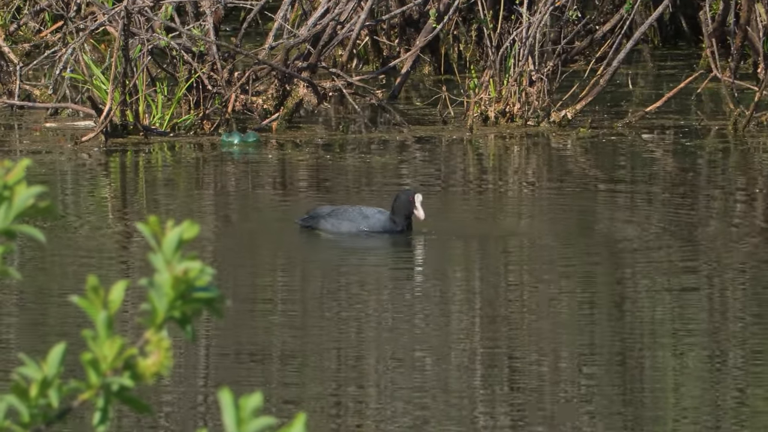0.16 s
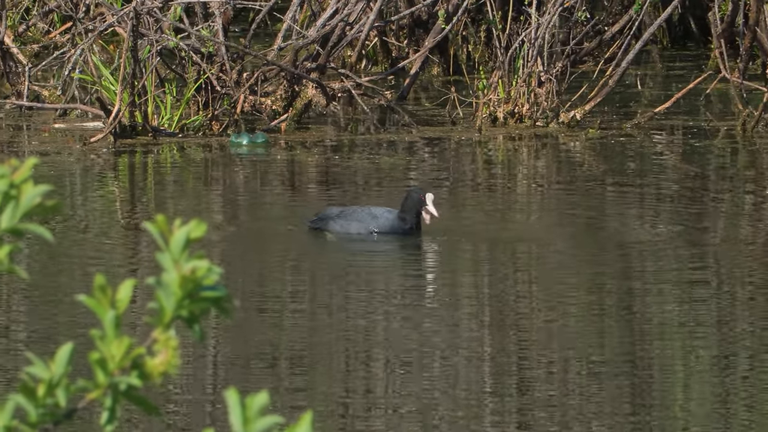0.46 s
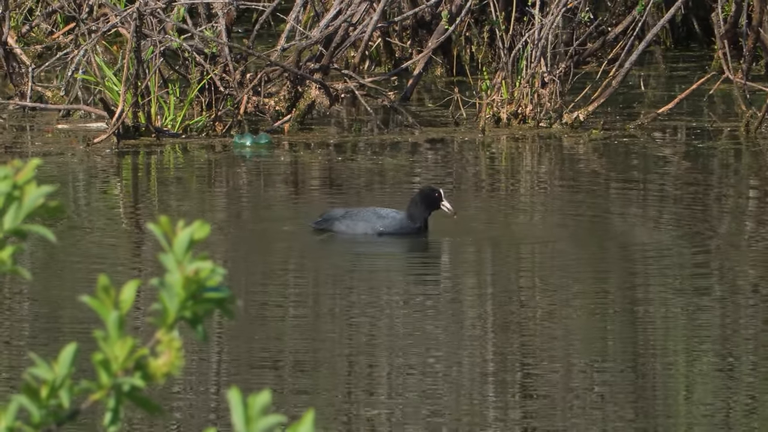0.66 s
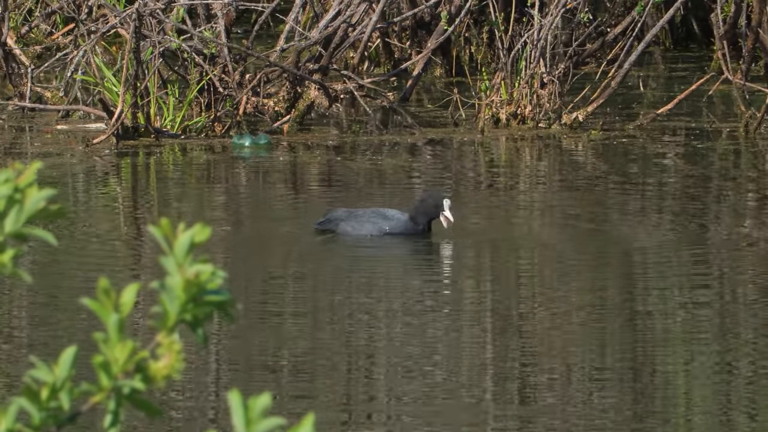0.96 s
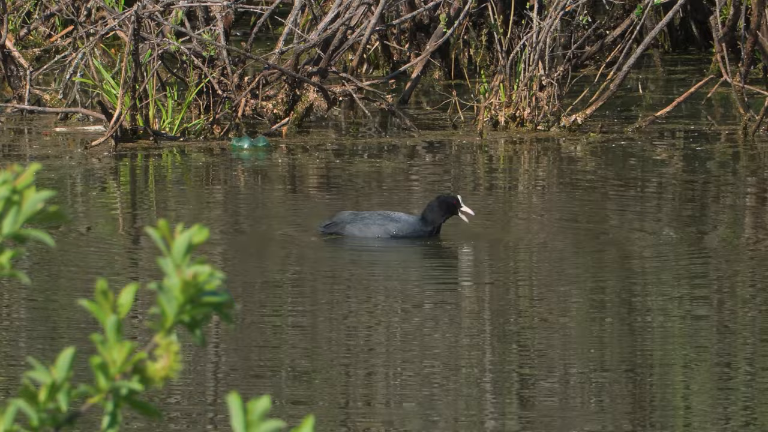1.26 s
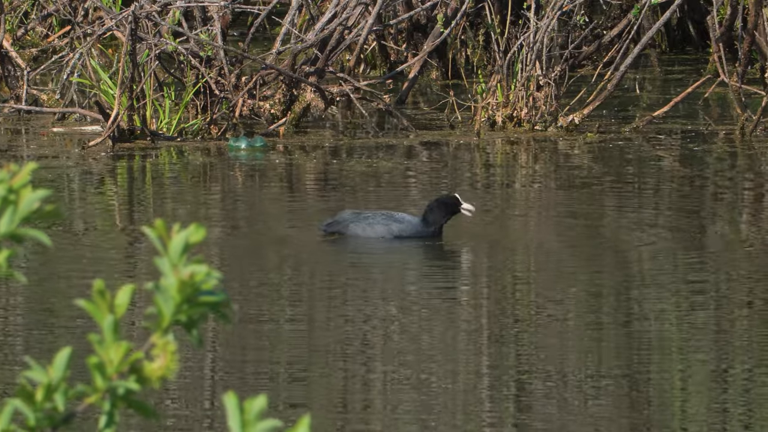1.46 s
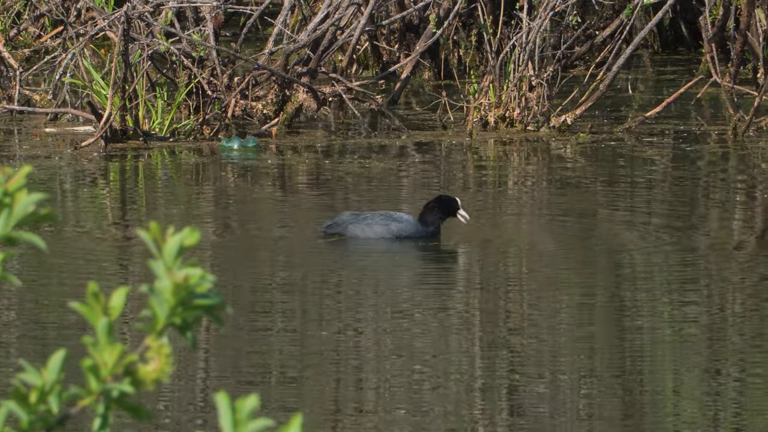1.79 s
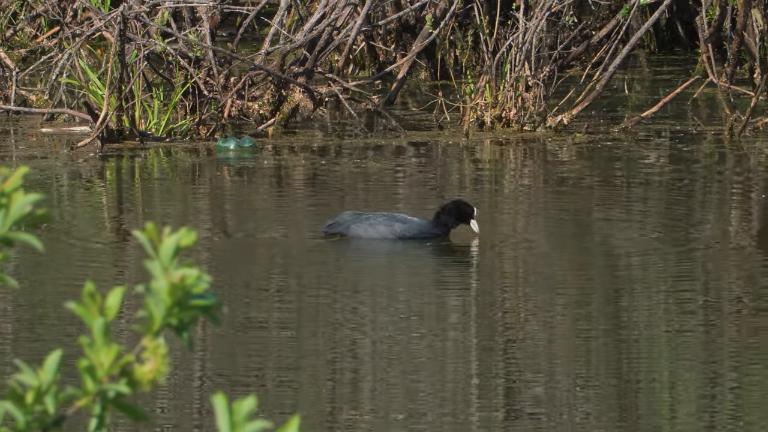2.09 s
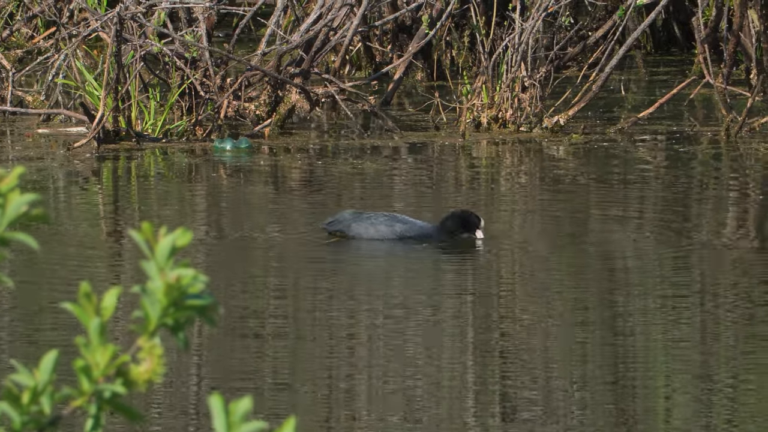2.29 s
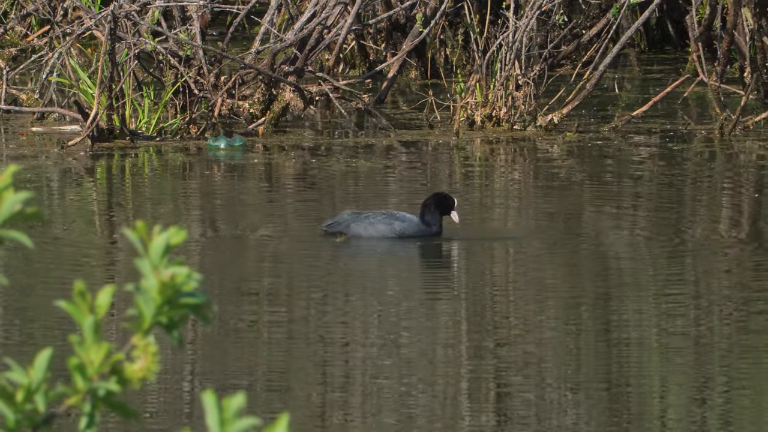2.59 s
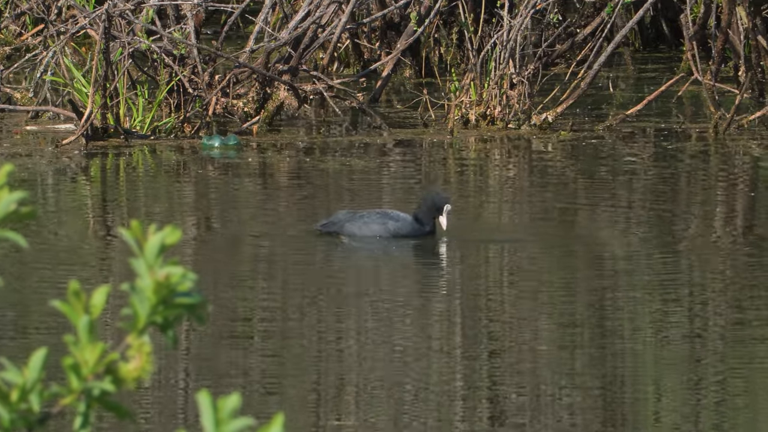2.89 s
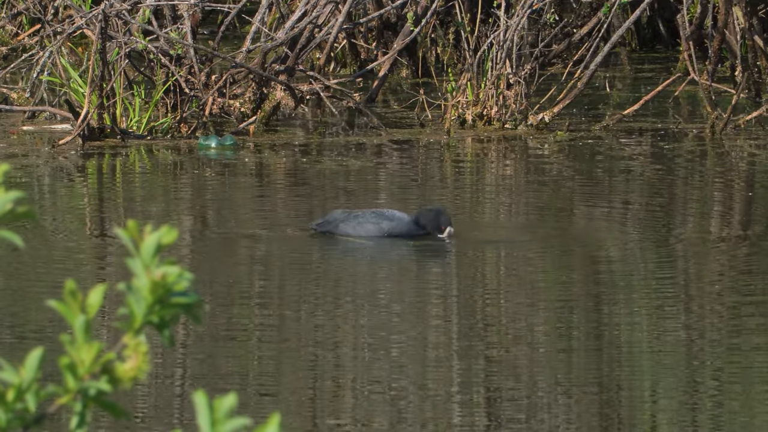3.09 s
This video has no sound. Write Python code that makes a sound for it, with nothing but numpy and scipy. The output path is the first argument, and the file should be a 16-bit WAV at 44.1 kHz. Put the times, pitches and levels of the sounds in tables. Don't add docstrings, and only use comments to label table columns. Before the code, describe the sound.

Outdoors at a pond, four clipped nasal waterbird honks come spaced about a second apart, the first faint. Overlapping frogs croak throughout, thickening later, while high songbird whistles repeat over soft air noise and distant machinery hum.

```python
import sys
import numpy as np
from scipy import signal
from scipy.fft import rfft, irfft
from scipy.io import wavfile
from scipy.ndimage import uniform_filter1d

SR = 44100
rng = np.random.default_rng(int(sys.argv[2]) if len(sys.argv) > 2 else 0)


def natural_amplitude(level_db):
    exponent = np.asarray(level_db, float) / 20
    return 10 ** exponent


def to_wav(s):
    ch = np.atleast_2d(s).T
    pcm = np.round(np.clip(ch, -1, 1) * 32767)
    wavfile.write(sys.argv[1], SR, pcm.astype(np.int16))


N = 143325


def rms1(x):
    return x / np.sqrt(np.mean(x ** 2) + 1e-18)


def walk(rate_hz, size=N):
    k = max(int(SR / rate_hz), 1)
    steps = np.repeat(rng.standard_normal(size // k + 1), k)
    return 1.24 * uniform_filter1d(uniform_filter1d(steps, k), k)[:size]


def ring(x, hz, width_hz):
    b, a = signal.iirpeak(hz, hz / width_hz, fs=SR)
    return signal.lfilter(b, a, signal.lfilter(b, a, x))


def add(out, start_s, x):
    i = max(int(start_s * SR), 0)
    out[i:i + len(x)] += x[:N - i]


def shape(length_s, attack_s, release_s):
    t = np.arange(int(length_s * SR)) / SR
    edge = np.clip(np.minimum(t / attack_s, (length_s - t) / release_s), 0, 1)
    return t / length_s, np.sin(edge * np.pi / 2)


def tone(hz, phase=0):
    return np.sqrt(2) * np.sin(2 * np.pi * np.cumsum(hz) / SR + phase)


# frequency in Hz, density in dB per Hz.
HUSH_SPECTRUM = [(26, -5), (42, -4), (90, -7), (170, -10), (300, -13), (900, -13), (2600, -28), (5200, -51)]
HUSH_DB = -43


def hush():
    f = np.maximum(np.fft.rfftfreq(N, 1 / SR), 1)
    hz, level_db = np.array(HUSH_SPECTRUM).T
    db = np.interp(np.log(f), np.log(hz), level_db, left=-40)
    db = db - 14 * np.maximum(np.log2(f / hz[-1]), 0)
    air = rms1(irfft(rfft(rng.standard_normal(N)) * natural_amplitude(db), N))
    return air * natural_amplitude(HUSH_DB + 0.8 * walk(2.8))


CHORUS_HZ, CHORUS_WIDTH_HZ, CHORUS_DB = 1700, 850, -46.5


def far_chorus():
    blur = rms1(ring(rng.standard_normal(N), CHORUS_HZ, CHORUS_WIDTH_HZ))
    return blur * natural_amplitude(CHORUS_DB + 1.7 * walk(14) + 0.87 * walk(220))


# time in seconds, level in dB.
HUM_LEVELS = [(0.0, -51.5), (1.38, -48), (1.42, -56), (1.47, -49), (1.76, -53.5), (1.79, -42.5),
              (1.95, -51), (1.97, -47), (2.34, -45), (2.39, -60), (2.42, -46.5), (2.52, -42.5), (2.56, -54),
              (2.72, -43.5), (2.82, -50.5), (3.01, -44), (3.13, -56.5), (3.25, -42.5)]
HUM_HZ, HUM_WANDER_DB, HUM_DRIFT = 120, 2.2, 0.02


def machinery():
    swell_db = np.interp(np.arange(N) / SR, *np.array(HUM_LEVELS).T)
    return tone(HUM_HZ * (1 + HUM_DRIFT * walk(7.68))) * natural_amplitude(swell_db + HUM_WANDER_DB * walk(19))


# start in seconds, peak in dB.
WATER_CLICK = [
    (3.1672, -51),
]


def water_click():
    out, t = np.zeros(N), np.arange(SR // 100) / SR
    for s, db in WATER_CLICK:
        click = rms1(ring(rng.standard_normal(len(t)), 10500, 6000))
        add(out, s, click * np.exp(-t / 0.0022) * natural_amplitude(db - 9))
    return out


# middle of croak in seconds, level in dB, throat pitch in Hz.
SMALL_FROG = [(0.082, -42, 2200), (0.218, -46.5, 2400), (0.444, -35.5, 2020), (0.566, -33.5, 2060),
              (0.673, -33, 2080), (0.825, -34.5, 2100), (0.938, -38, 2170), (1.066, -40, 2220),
              (1.19, -41.5, 2190), (1.31, -37, 2110), (2.677, -34, 1800), (3.028, -31, 1780),
              (0.49, -36.5, 1710), (0.715, -39.5, 1400), (0.77, -36, 2070), (3.06, -51, 2040)]
OTHER_FROG = [(1.428, -47, 2180), (1.54, -41, 2140), (1.638, -39, 2080), (1.817, -67, 2200),
              (1.994, -42.5, 2080), (2.05, -43, 2130), (2.104, -41, 2140), (2.218, -39.5, 2260),
              (2.332, -39, 2140), (2.444, -36.5, 2060), (2.568, -33.5, 2020), (2.682, -37, 2110),
              (2.809, -38, 2050), (2.912, -37.5, 2130), (2.99, -40.5, 2100), (3.18, -48.5, 2180)]
BIG_FROGS = [(0.207, -72, 1700), (0.272, -59, 1550), (0.334, -38.5, 1810), (0.383, -40, 1620),
             (0.599, -39.5, 1230), (0.78, -37, 1510), (0.857, -38.5, 1530), (1.117, -41, 1420),
             (1.197, -35.5, 1430), (1.264, -35, 1500), (1.396, -34.5, 1650), (1.445, -35, 1660),
             (1.551, -32.5, 1540), (1.614, -36.5, 1610), (1.686, -30, 1650), (1.835, -33.5, 1510),
             (1.882, -40, 1500), (1.945, -33, 1450), (2.043, -31.5, 1556), (2.115, -31, 1700),
             (2.207, -34, 1700), (2.297, -33, 1510), (2.407, -30, 1520), (2.555, -32, 1480),
             (2.628, -33.5, 1730), (2.721, -35, 1530), (2.809, -32, 1700), (2.903, -30, 1606),
             (3.132, -35.5, 1510), (3.216, -32, 1370)]
DEEP_FROG = [(1.65, -37, 1150), (1.69, -33, 1200), (1.585, -38.5, 1170), (1.755, -35.5, 1420),
             (1.81, -43, 1200), (1.9, -47.5, 1250), (1.94, -45, 1190), (2.01, -36.5, 1380),
             (2.16, -36, 1420), (2.25, -44.5, 1330), (2.5, -32, 1450), (0.78, -41, 1170), (0.86, -45, 1010),
             (2.35, -42.5, 1300), (2.96, -43, 1320)]
# croak in seconds, pulses per second, throat width in Hz, sac over throat pitch, sac in dB.
SMALL_VOICE, OTHER_VOICE = (.055, 270, 480, 2.08, -15), (.06, 280, 450, 1.73, -13)
BIG_VOICE = (.07, 265, 500, 2.3, -19)
CROAK_SLOWING, CROAK_JITTER, CROAK_SPREAD = .12, .035, .09
CROAK_SCATTER_DB, CROAK_RASP, SAC_WIDTH_HZ, FROG_DB, FROG_TOP_HZ = 1.4, .3, 680, -3, 4760


def croak(hz, voice):
    length_s, rate_hz, width_hz, sac, sac_db = voice
    u, env = shape(length_s, length_s / 2, length_s / 2)
    slowing = CROAK_SLOWING * np.arange(40) / (rate_hz * length_s)
    uneven = CROAK_JITTER * rng.standard_normal(40) + CROAK_SPREAD * rng.standard_normal()
    at = (np.cumsum((1 + slowing + uneven) / rate_hz) * SR).astype(int)
    at = at[at < len(u)]
    pulses = np.zeros(len(u))
    pulses[at] = natural_amplitude(CROAK_SCATTER_DB * rng.standard_normal(len(at)))
    drive = rms1(pulses) + CROAK_RASP * rng.standard_normal(len(u))
    throat = rms1(ring(drive, hz, width_hz))
    return (throat + natural_amplitude(sac_db) * rms1(ring(drive, sac * hz, SAC_WIDTH_HZ))) * env


def frogs():
    out = np.zeros(N)
    for table, voice in ((SMALL_FROG, SMALL_VOICE), (OTHER_FROG, OTHER_VOICE),
                         (BIG_FROGS, BIG_VOICE), (DEEP_FROG, BIG_VOICE)):
        for middle_s, db, hz in table:
            add(out, middle_s - voice[0] / 2, croak(hz, voice) * natural_amplitude(db + FROG_DB))
    return signal.sosfilt(signal.butter(6, FROG_TOP_HZ, fs=SR, output="sos"), out)


# start in seconds, peak in dB.
TICKS = [(1.1644, -55), (1.775, -49.5), (2.019, -57), (2.22, -52), (2.375, -50.5), (2.5062, -50),
         (2.734, -52.5), (2.9482, -57), (3.2231, -53)]
TICK_HZ, TICK_WIDTH_HZ, TICK_DECAY_S, TICK_DB = 5250, 1800, 0.014, -4


def ticks():
    out, t = np.zeros(N), np.arange(SR // 20) / SR
    for s, db in TICKS:
        narrow = ring(rng.standard_normal(len(t)), TICK_HZ, TICK_WIDTH_HZ)
        rasp = rms1(ring(narrow, TICK_HZ, 2 * TICK_WIDTH_HZ))
        add(out, s, rasp * np.exp(-t / TICK_DECAY_S) * natural_amplitude(db + TICK_DB))
    return out


# start in seconds, length in seconds, from Hz, to Hz, level in dB.
SLURS = [(2.431, .042, 4260, 3730, -42), (.308, .072, 4600, 4930, -59), (.72, .125, 4670, 4960, -59),
         (1.148, .114, 4720, 5000, -62), (1.585, .11, 4800, 4980, -62), (.929, .117, 3320, 3600, -45),
         (1.658, .08, 3900, 4190, -46), (2.943, .115, 3000, 3830, -50), (.67, .03, 5200, 6920, -65),
         (2.325, .065, 4650, 4270, -53), (1.556, .032, 4200, 3720, -41), (2.187, .036, 3700, 4200, -50),
         (1.824, .052, 3180, 3320, -42), (.09, .026, 4400, 4100, -55), (2.296, .036, 3700, 4050, -52)]
BURRED = [
    (.094, .11, 3900, 3050, -41.5),
    (.494, .112, 3900, 3070, -42.5),
    (.911, .105, 3880, 3080, -47),
    (1.327, .112, 3950, 3040, -47),
    (1.757, .105, 3800, 3040, -47),
    (2.114, .1, 3300, 2760, -50),
]
GLIDES = [(.857, .046, 3310, 3220, -43), (.898, .028, 3300, 3280, -43), (1.05, .045, 3560, 3600, -54),
          (1.091, .026, 4140, 4120, -47), (1.11, .032, 4110, 3590, -45), (1.211, .092, 2830, 2920, -45),
          (1.297, .056, 2960, 2940, -50), (1.772, .05, 4190, 4190, -49), (1.868, .072, 3270, 3490, -42.5),
          (1.934, .052, 3470, 3080, -41), (2.225, .032, 4250, 3400, -57), (2.223, .075, 5100, 4730, -58),
          (2.178, .042, 5330, 5320, -62), (2.312, .02, 3500, 4700, -53), (2.3, .03, 5000, 5200, -60),
          (2.115, .022, 3300, 3050, -50), (2.412, .026, 4300, 4310, -51), (3.208, .042, 3940, 4010, -51),
          (1.972, .28, 6200, 5550, -75), (2.632, .168, 8320, 7550, -80), (3.168, .068, 1290, 1260, -44),
          (2.383, .034, 4180, 4050, -55), (.072, .024, 6600, 4500, -63), (1.526, .036, 6050, 4150, -49),
          (1.372, .05, 2970, 2840, -54), (1.578, .046, 3720, 3680, -38), (1.617, .052, 3770, 3670, -44),
          (2.463, .05, 3720, 3680, -41), (2.512, .045, 3690, 3680, -45), (1.826, .165, 4170, 4160, -63),
          (1.145, .045, 3580, 3750, -53), (1.732, .03, 3700, 3690, -52), (2.2, .1, 2820, 2880, -56),
          (2.145, .02, 2950, 3250, -53), (2.03, .08, 2900, 3000, -55), (1.985, .035, 3050, 3300, -50),
          (2.655, .05, 3680, 3760, -53), (2.775, .05, 3720, 3800, -52), (2.605, .022, 3150, 3300, -51)]
# start in seconds, length in seconds, centre in Hz, level in dB.
TRILLS = [
    (0.212, 0.099, 4390, -59.5),
    (2.035, 0.07, 3590, -57),
]
TRILL_SWING_HZ, TRILL_RATES_HZ, TRILL_DEPTHS = 285, (43, 72), (.2, .9)
SLUR_BEND, FALL_FADE_DB, GLIDE_FADE_DB = 3.3, 6, 2
BURR_HZ, BURR_DEPTH, BURR_FADE_DB, BURR_PEAK, BURR_RISE_S = 250, .55, 8, .36, .035
WHISTLE_ATTACK_S, WHISTLE_RELEASE_S, WHISTLE_FLUTTER_DB, WHISTLE_JITTER = .008, .01, 1.5, .005


def whistles():
    out, wobble, flutter = np.zeros(N), walk(90), walk(70)

    def sing(s, length, track, db, fade_db=0, throb_hz=0, depth=0, peak=0.46, rise_s=WHISTLE_ATTACK_S):
        u, env = shape(length, rise_s, WHISTLE_RELEASE_S)
        i = np.minimum(int(s * SR) + np.arange(len(u)), N - 1)
        env = env * (1 + depth * np.sin(2 * np.pi * throb_hz * length * u))
        level_db = db - fade_db * 2 * np.abs(u - peak) + WHISTLE_FLUTTER_DB * flutter[i]
        add(out, s, tone(track(u) * (1 + WHISTLE_JITTER * wobble[i])) * env * natural_amplitude(level_db))

    def settle(u):
        end = np.exp(-SLUR_BEND)
        return (np.exp(-SLUR_BEND * u) - end) / (1 - end)

    for s, length, a, b, db in SLURS:
        sing(s, length, lambda u: b + (a - b) * settle(u), db, FALL_FADE_DB * (a > b))
    for s, length, a, b, db in BURRED:
        sing(s, length, lambda u: b + (a - b) * settle(u), db,
             BURR_FADE_DB, BURR_HZ, BURR_DEPTH, BURR_PEAK, BURR_RISE_S)
    for s, length, a, b, db in GLIDES:
        sing(s, length, lambda u: a + (b - a) * u, db, GLIDE_FADE_DB)
    for (s, length, hz, db), rate, depth in zip(TRILLS, TRILL_RATES_HZ, TRILL_DEPTHS):
        sing(s, length, lambda u: hz - TRILL_SWING_HZ * np.cos(2 * np.pi * rate * length * u), db,
             0, rate, depth)
    return out


SLAP_S, SLAP_DB = .021, -15


def songbirds():
    out = whistles() + ticks()
    add(out, SLAP_S, out * natural_amplitude(SLAP_DB))
    return out


# start in seconds, length in seconds, pitch in Hz, level in dB, overtone boost in dB.
HONKS = [
    (0.012, 0.04, 908, -34.5, -4),
    (0.6375, 0.069, 925, -30, 1),
    (1.4875, 0.063, 928, -29, -2.5),
    (2.439, 0.066, 930, -29.5, -3),
]
# multiple of the pitch, level in dB.
HONK_HARMONICS = [(1, -.5), (2, 0), (3, -13.5), (4, -30), (5, -33), (6, -41), (7, -48), (8, -48), (9, -43),
                  (10, -48)]
HONK_SAG, HONK_BEND, HONK_ATTACK_S, HONK_RELEASE_S = .125, 2.1, .007, .024
HONK_DULLING_DB, HONK_THINNING_DB = 8, 7
HONK_JITTER, HONK_FLUTTER_DB, HONK_LAG_RAD = .003, 1.2, .35


def coot():
    out, wobble, flutter = np.zeros(N), walk(150), walk(120)
    for s, length, hz, db, bright_db in HONKS:
        u, env = shape(length, HONK_ATTACK_S, HONK_RELEASE_S)
        i = int(s * SR) + np.arange(len(u))
        f = hz * (1 - HONK_SAG * u ** HONK_BEND + HONK_JITTER * wobble[i])
        stack = np.zeros(len(u))
        for k, level_db in HONK_HARMONICS:
            if k == 1:
                level_db = level_db - HONK_THINNING_DB * u ** 2
            if k > 2:
                own_flutter_db = 2 * HONK_FLUTTER_DB * flutter[i - 300 * k]
                level_db = level_db - HONK_DULLING_DB * u + bright_db + own_flutter_db
            stack += natural_amplitude(level_db) * tone(k * f, -np.pi / 2 - HONK_LAG_RAD * (k - 1) ** 2)
        add(out, s, stack * env * natural_amplitude(db + HONK_FLUTTER_DB * flutter[i]))
    return out


BANK_T60_S, LEAF_T60_S, LEAF_DB, ECHO_GAP_S = 1.0, .15, 5, .004
BIRD_ECHO_DB, FROG_ECHO_DB, COOT_ECHO_DB = -5, -4, -10


def bank_echo(send):
    t = np.arange(SR) / SR
    decay = natural_amplitude(-60 * t / BANK_T60_S) + natural_amplitude(LEAF_DB - 60 * t / LEAF_T60_S)
    tail = rng.standard_normal(SR) * decay * (t > ECHO_GAP_S)
    tail /= np.sqrt(np.sum(tail ** 2))
    return signal.fftconvolve(send, tail)[:N]


def scene():
    background = hush() + far_chorus() + machinery()
    croaks, birds, honks = frogs(), songbirds(), coot()
    send = birds * natural_amplitude(BIRD_ECHO_DB) + croaks * natural_amplitude(FROG_ECHO_DB) + honks * natural_amplitude(COOT_ECHO_DB)
    return (background + water_click() + croaks + birds + honks + bank_echo(send))[None]


def top_cut(x):
    return signal.sosfilt(signal.butter(12, 15770, fs=SR, output="sos"), x)


HISS_DB, HISS_TILT_DB, TOP_HZ = -66, -2.5, 15780


def record(dry):
    f = np.fft.rfftfreq(N, 1 / SR)
    hiss = rms1(irfft(rfft(rng.standard_normal(N)) * natural_amplitude(HISS_TILT_DB * f / 8000), N))
    top = signal.ellip(8, .2, 60, TOP_HZ, fs=SR, output="sos")
    return top_cut(signal.sosfilt(top, dry + hiss * natural_amplitude(HISS_DB)))


dry = scene()
out = record(dry)
to_wav(out)
```